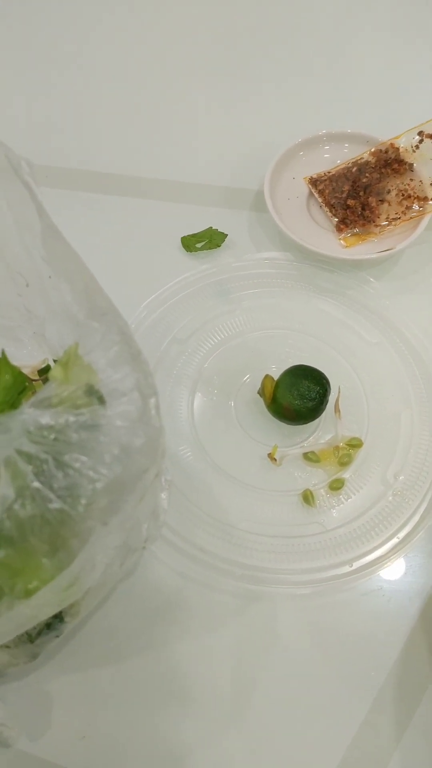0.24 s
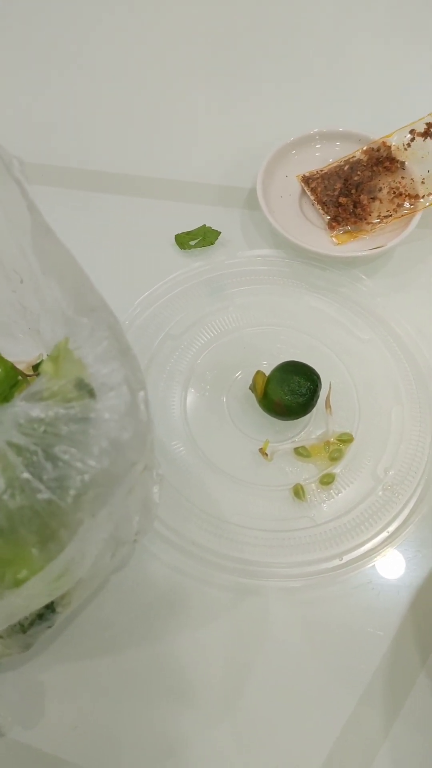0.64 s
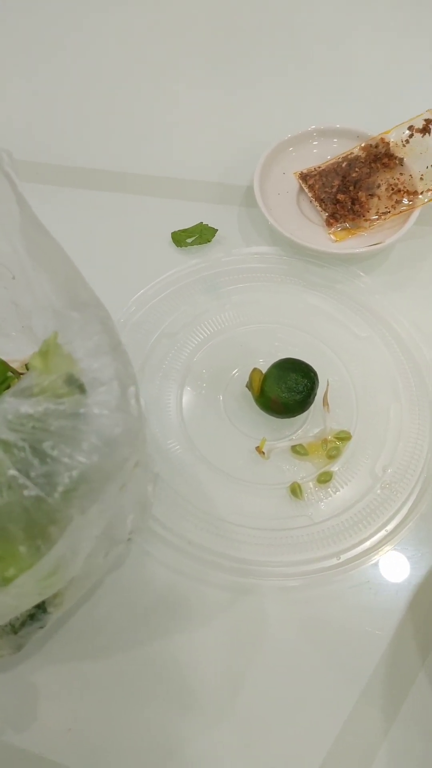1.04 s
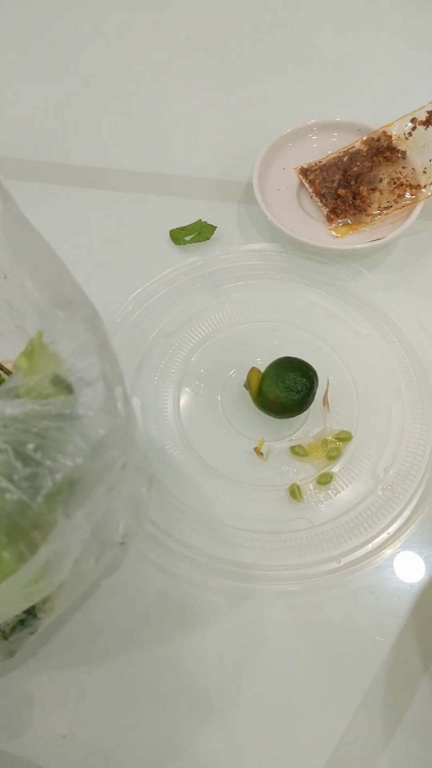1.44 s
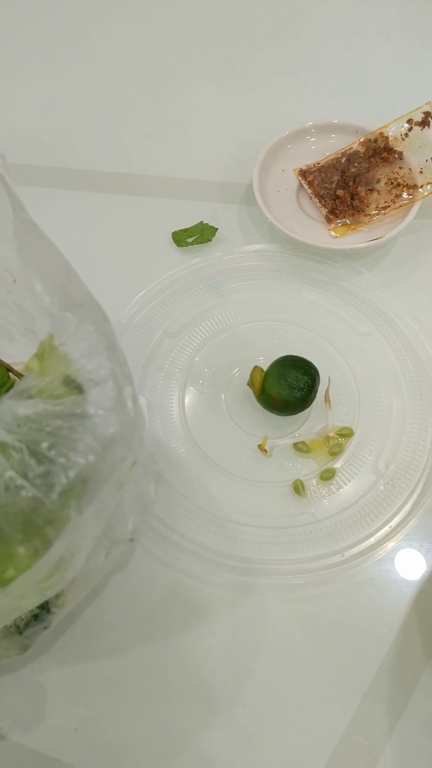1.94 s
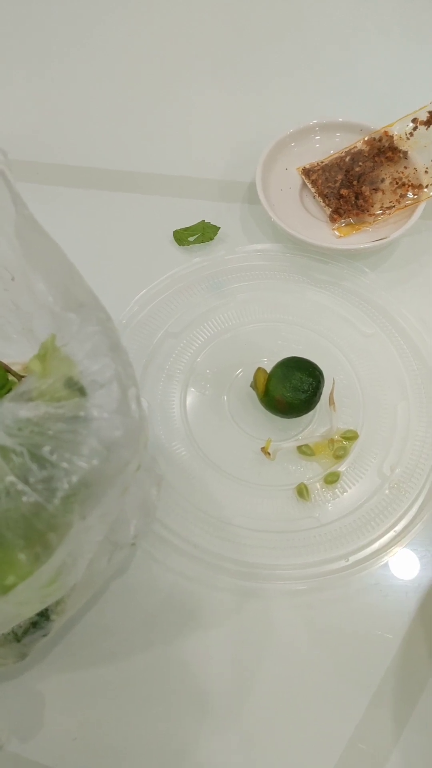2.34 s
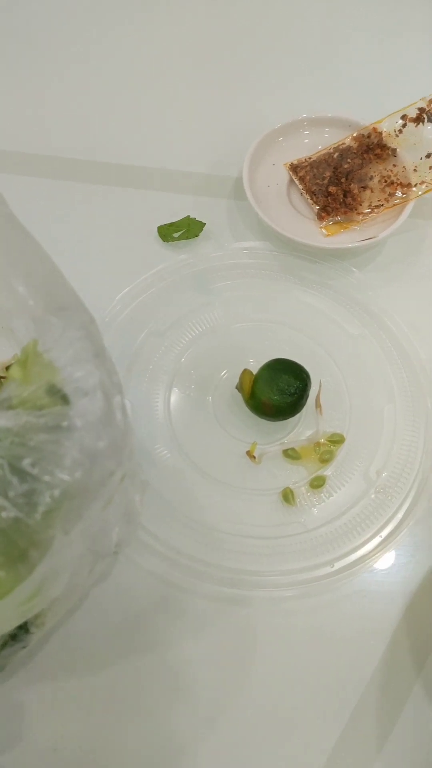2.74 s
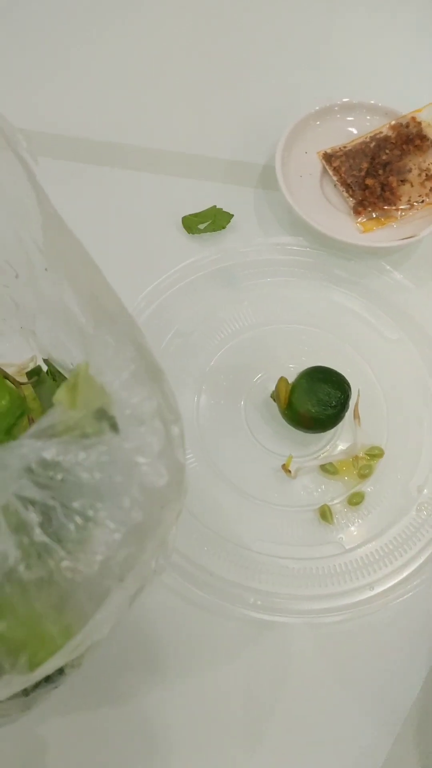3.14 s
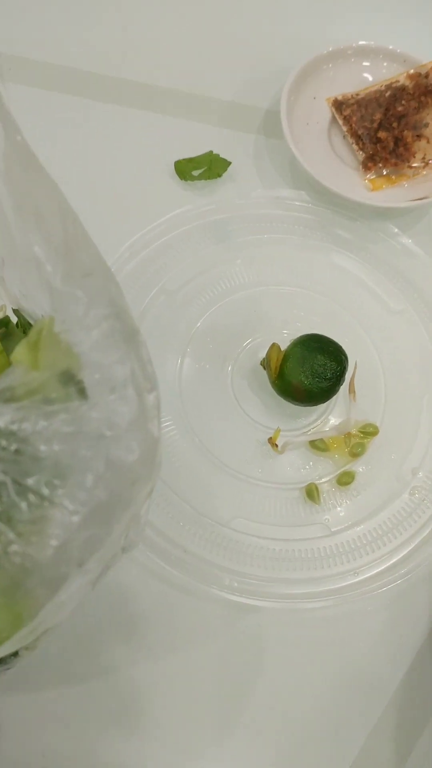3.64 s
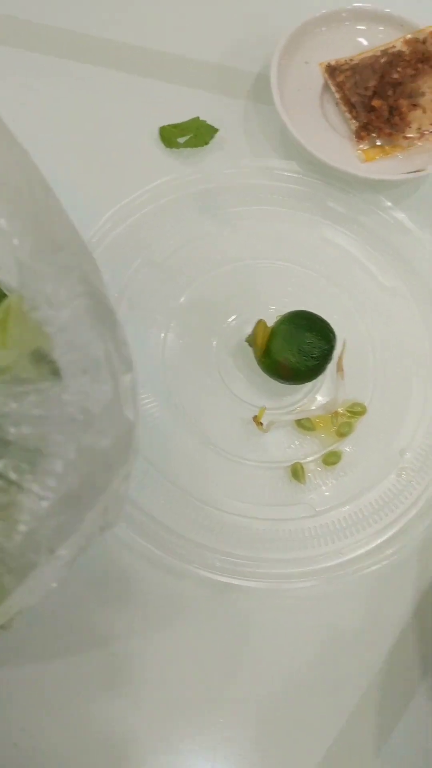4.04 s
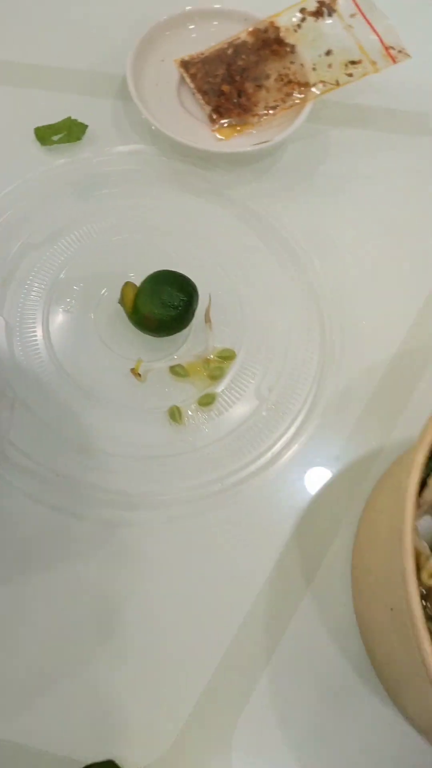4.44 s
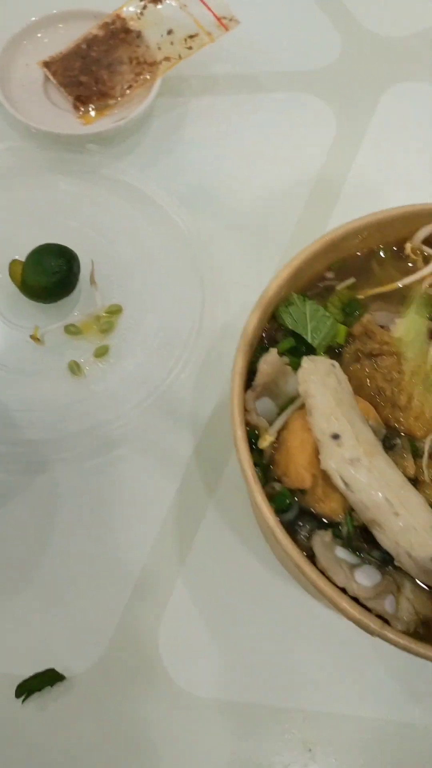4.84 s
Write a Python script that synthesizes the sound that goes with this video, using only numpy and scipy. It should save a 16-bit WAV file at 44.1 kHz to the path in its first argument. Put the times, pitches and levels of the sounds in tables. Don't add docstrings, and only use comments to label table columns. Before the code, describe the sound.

Thin plastic food containers click and tap in uneven bursts on a table, over a steady low fan hum in an echoing room.

```python
import sys
import numpy as np
from scipy import signal
from scipy.fft import rfft, irfft
from scipy.io import wavfile

SR = 44100
rng = np.random.default_rng(int(sys.argv[2]) if len(sys.argv) > 2 else 0)


def rack_gain(trim_db):
    fader = np.asarray(trim_db, float)
    return 10 ** (fader / 20)


def wav_record(signal):
    frames = np.transpose(np.atleast_2d(signal))
    bounded = np.clip(frames, -1, 1)
    quanta = np.round(bounded * 32767).astype(np.int16)
    wavfile.write(sys.argv[1], SR, quanta)


N = 223840

# start in seconds, peak in dB, body mode in Hz, crack relative to it in dB.
LID_TAPS = [(0.3207, -19.5, 1180, -32), (1.433, -46.5, 1740, 2), (2.1902, -21.5, 895, -14),
            (2.2035, -21.5, 960, -65), (2.3751, -19, 1190, -32), (2.5836, -37, 770, -50),
            (3.617, -45.5, 970, -30), (3.8493, -32, 1297, -43), (4.378, -19.5, 605, -23),
            (4.5194, -19, 1023, -28), (4.7587, -34, 1180, -13)]
# start in seconds, peak in dB, body mode in Hz, crack relative to it in dB.
TUB_TAPS = [(0.3186, -28.5, 1070, -13), (1.4961, -43, 950, -9), (2.1865, -23, 1325, -23),
            (2.1933, -32.5, 437, -14), (2.196, -27, 950, -25), (2.2002, -25, 785, -52),
            (2.372, -36.5, 1570, 0), (3.0844, -49, 1300, -2), (3.0887, -44.5, 960, -3),
            (3.705, -32, 503, -35), (3.7149, -29, 727, -39), (4.3161, -29, 850, -9),
            (4.3442, -42.5, 2540, -17), (4.8807, -40.5, 1020, -3), (4.885, -39, 860, -9)]
# start in seconds, peak in dB, body mode in Hz, relative crack in dB.
LATCH_SNAPS = [
    (.229, -56, 1910, -20),
    (0.321, -25.5, 2423, -12),
    (.7538, -38.5, 2210, -20),
    (3.8486, -29.5, 3000, -25),
    (4.378, -33.5, 1900, -37),
    (4.897, -50, 2420, -25),
]
# start in seconds, peak in dB, body mode in Hz.
HELD_TAPS = [
    (0.7283, -21.5, 1160),
    (0.755, -39, 1110),
    (.88, -45, 980),
    (2.326, -36, 905),
    (3.711, -33.5, 1180),
    (3.7253, -29, 1200),
    (3.8514, -31.5, 432),
    (4.304, -38, 1190),
    (4.5215, -26, 780),
    (4.5481, -39, 1040),
]
# start in seconds, peak in dB.
NAIL_CLICKS = [
    (.279, -59),
    (0.7475, -51),
    (0.9337, -51.5),
    (2.433, -59),
    (4.2053, -49.5),
    (5.04, -46.5),
]
# multiple of the body mode (ratio), level relative to it in dB.
LID_RIM = [(1.48, -2.5), (2.95, -14.5)]
TUB_RIM = [(2.23, -7)]
LATCH_RIM = [(1.33, -0.5), (1.82, -6)]
HELD_RIM = [(2.53, -20.5)]
NAIL_RIM = [(3.9, -14)]
# start in seconds, peak in dB, hollow in Hz, t60 in seconds.
THUMPS = [(2.191, -25.5, 204.4, 0.11), (2.196, -18.5, 358, 0.024), (2.21, -27, 230, 0.079),
          (2.25, -35, 217.5, 0.19), (2.284, -30, 233, 0.062), (2.325, -32, 248, .033),
          (3.086, -33, 218.6, 0.13), (3.74, -52.5, 88, .3), (3.761, -42, 247.6, 0.3),
          (3.851, -40.5, 204.5, 0.28), (4.316, -42.5, 113, 0.1), (4.377, -35, 289, 0.094),
          (4.4, -49, 403, .2), (4.519, -37.5, 206, 0.15)]
# start in seconds, peak in dB, pitch in Hz.
TICKS = [(.322, -48, 11900), (1.2093, -67, 9050), (1.434, -58, 13000), (1.498, -64, 11000),
         (1.53, -68, 10500), (2.187, -51, 11500), (2.376, -63, 12000), (2.556, -68, 10000),
         (3.265, -47.5, 12400), (3.2663, -53, 15000), (3.2675, -47, 7800), (3.288, -53, 13500),
         (3.3349, -56, 13000), (3.6627, -52, 5530), (3.8492, -51, 12000), (4.13, -61, 11000),
         (4.88, -61, 11100)]
# start in seconds, peak in dB, pitch in Hz.
SLIDES = [
    (1.7715, -59.5, 5400),
    (2.76, -60, 4900),
    (3.272, -68, 13500),
    (3.875, -59, 5760),
    (3.88, -49, 2420),
]
# time at its height in seconds, spread in seconds, level in dB.
BRUSHES = [
    (.23, 0.027, -76),
    (1.15, 0.15, -88),
    (1.47, 0.064, -71),
    (2.92, 0.19, -71),
    (3.65, 0.19, -67),
    (4.14, 0.042, -93),
    (4.45, 0.19, -74.5),
    (4.74, 0.07, -70.5),
]
# start in seconds, level in dB.
SETTLING = [
    (0, -71.5),
    (.36, -69.5),
    (.755, -69),
    (1.56, -75.5),
    (2.2, -67),
    (2.4, -83),
    (3.855, -63),
    (4.35, -65.5),
    (4.95, -73),
]
# frequency in Hz, density in dB per Hz.
RUSTLE_COLOUR = [(1200, -14), (2200, 17), (4500, 8), (6000, 4.5), (7500, -11), (10000, -44)]
# frequency in Hz, density in dB per Hz.
SHEEN_COLOUR = [(6000, -13), (9000, -6), (13000, -13.5), (16000, -16)]
# frequency in Hz, t60 in seconds.
ROOM_T60 = [(200, 0.61), (1000, 0.77), (4000, 0.69), (10000, 1)]
# peak in dB, low edge in Hz, high edge in Hz, t60 in seconds.
EARLIER_KNOCK = (-46.5, 502, 1781, 0.5)
# frequency in Hz, density in dB per Hz.
AIR = [(20, -14.5), (50, -21), (110, -29), (140, -21), (200, -5.5), (300, -9.5), (400, -18.5), (800, -24.5),
       (1250, -24.5), (1700, -33.5), (2300, -48), (4500, -63), (7500, -56.5), (16000, -79)]
# centre in Hz, width in Hz, density in dB per Hz.
DUCT = [(161, 7.7, -17.5), (190.5, 10, -5), (244.6, 18.1, 2), (275.3, 11, -4.5), (341.6, 4.9, -3.5),
        (579, 7.6, -7.5), (1190, 135, -26.5), (2900, 420, -27), (3288, 570, -22.5), (3630, 380, -29),
        (5770, 950, -50.5), (9700, 360, -63)]
# centre in Hz, width in Hz, height over the air noise in dB.
WHINE = [(2930, 30, 4), (3110, 40, 3), (3360, 55, 6.5), (3570, 40, 3)]
# frequency in Hz, left-right likeness (ratio).
LIKENESS = [(60, 0.77), (130, 0.98), (290, 0.91), (640, 0.36), (1410, -0.0), (3100, 0.19), (6820, 0.0),
            (15000, 0)]
# frequency in Hz, left minus right in dB.
LEAN = [(60, 3), (240, -2), (950, -1.5), (3770, 1.5), (15000, -7)]

RING_T60_S, RING_SLOPE = 0.014, 0.35
CRACK_LOW_HZ, CRACK_HIGH_HZ, CRACK_T60_S = 3000, 5920, 0.011
SPLASH_DB, SPLASH_T60_S = -7, 0.031
HELD_CRACK_DB = -41
NAIL_HZ, NAIL_CRACK_DB = 1300, -5
TICK_T60_S, SLIDE_T60_S = 0.008, 0.32
SETTLE_RISE_S, SETTLE_DB_PER_S = 0.005, 36.5
REST_DB = -92
BRUSH_SHEEN_DB, SETTLE_SHEEN_DB, REST_SHEEN_DB = -7.5, -17, 1.5
HANDS_PAN_DB, HANDS_LAG_S = -4.5, 0.00004
PULSE_DB = -21.5
ROOM_DB, MODES_TO_ROOM_DB = -35, -18
FIRST_WALL_S, EARLY_T60_S, EARLY_DB, WALL_CUT_HZ = 0.0097, 0.2, -2.5, 3640
HUM_DB, MOTOR_HZ, MOTOR_DB = -51, 157, -63
BASS_CUT_HZ, TOP_CUT_HZ = 119, 15700


def taps():
    near, far = np.zeros((2, N)), np.zeros(N)
    for s, db, body_hz, crack_db, rim_ratios in contacts():
        rise_cycles = 0.15 - crack_db / 80
        rim = [(body_hz * times, rim_db) for times, rim_db in rim_ratios]

        for hz, level_db in [(body_hz, 0), (body_hz * 0.751, -11), *rim]:
            t60 = RING_T60_S * (hz / 1000) ** -RING_SLOPE
            add(near, s, rack_gain(db + level_db) * ring(hz, t60, rise_cycles, 1.172))
        snap = crack(CRACK_LOW_HZ, CRACK_HIGH_HZ, CRACK_T60_S, 0.51)
        add(near, s, rack_gain(db + crack_db) * snap)
        rim_hz, rim_db = rim[0]
        splash = crack(body_hz * 0.24, rim_hz * 1.34, SPLASH_T60_S, 0.79)
        add(near, s, rack_gain(db + SPLASH_DB + rim_db / 2) * splash)

        add(far, s, rack_gain(db) * knock(body_hz * 0.5, body_hz * 1.265))
        for hz, level_db in rim:
            add(far, s, rack_gain(db + level_db) * knock(hz * 0.52, hz * 1.45))
        add(far, s, rack_gain(db + crack_db - 7) * knock(CRACK_LOW_HZ, CRACK_HIGH_HZ))
    return near, far


def contacts():
    lid = [(*row, LID_RIM) for row in LID_TAPS]
    tub = [(*row, TUB_RIM) for row in TUB_TAPS]
    latch = [(*row, LATCH_RIM) for row in LATCH_SNAPS]
    held = [(*row, HELD_CRACK_DB, HELD_RIM) for row in HELD_TAPS]
    nails = [(*row, NAIL_HZ, NAIL_CRACK_DB, NAIL_RIM) for row in NAIL_CLICKS]
    return lid + tub + latch + held + nails


def ring(hz, t60, rise_cycles, bend):
    t = np.arange(round(t60 * SR)) / SR
    decay = rack_gain(-60 * (t / t60) ** bend)
    build = 1 - np.exp(-(t * hz / rise_cycles) ** 2)
    return np.sin(2 * np.pi * hz * t) * decay * build


def crack(low_hz, high_hz, t60, alike):
    t = np.arange(9000) / SR
    shared, left, right = rng.standard_normal((3, len(t)))
    noise = alike * shared + (1 - alike) * np.array([left, right])
    spit = band(noise * rack_gain(-60 * t / t60), low_hz, high_hz, order=3)
    return spit / np.abs(spit).max()


def knock(low_hz, high_hz):
    impulse = 1.0 * (np.arange(600) == 0)
    pulse = band(impulse, low_hz, high_hz, order=2)
    return pulse / np.abs(pulse).max()


def thumps():
    out = np.zeros(N)
    for s, db, hz, t60 in THUMPS:
        add(out, s, rack_gain(db) * ring(hz, t60, 0.63, 0.94))
    return out


def ticks():
    out = np.zeros((2, N))
    for rows, t60 in [(TICKS, TICK_T60_S), (SLIDES, SLIDE_T60_S)]:
        for s, db, hz in rows:
            add(out, s, rack_gain(db) * crack(hz * 0.7, hz * 1.21, t60, 0.39))
    return out


def rustle():
    t = np.arange(N) / SR
    brushing = sum(rack_gain(db) * np.exp(-0.5 * ((t - s) / spread) ** 2) for s, spread, db in BRUSHES)
    settling = 0
    for s, db in SETTLING:
        age = np.maximum(t - s, 0)
        settling = settling + rack_gain(db - SETTLE_DB_PER_S * age) * (1 - np.exp(-age / SETTLE_RISE_S))

    unevenness_db = 1.2 * drift(150) + 1.7 * drift(6.6)
    grains = rng.standard_normal((2, N)) * rack_gain(unevenness_db)
    dull = coloured(grains, rack_gain(at_hz(RUSTLE_COLOUR, bins(N))))
    sheen = coloured(grains, rack_gain(at_hz(SHEEN_COLOUR, bins(N))))
    body = brushing + settling + rack_gain(REST_DB)
    shine = rack_gain(BRUSH_SHEEN_DB) * brushing + rack_gain(SETTLE_SHEEN_DB) * settling + rack_gain(REST_DB + REST_SHEEN_DB)
    return rack_gain(1.0) * (body * dull + rack_gain(-6.5) * shine * sheen)


def room(x):
    t = np.arange(SR) / SR
    white, echo = rng.standard_normal((2, SR)), 0
    after = np.maximum(t - FIRST_WALL_S, 0)
    early = rack_gain(EARLY_DB - 60 * after / EARLY_T60_S)
    for low_hz in 88 * 2.0 ** np.arange(8):
        late = rack_gain(-60 * after / at_hz(ROOM_T60, low_hz * np.sqrt(2)))
        echo = echo + band(white, low_hz, 2 * low_hz, order=2) * (late + early)
    echo = echo * (1 - np.exp(-after / 0.0041))
    soft_goods = signal.butter(2, WALL_CUT_HZ, fs=SR, output="sos")
    echo = signal.sosfilt(soft_goods, echo)
    return signal.fftconvolve(echo, x[None], axes=1)[:, :N]


def fan():
    hz = bins(N)
    power = rack_gain(at_hz(AIR, hz)) ** 2
    power = power + resonances(DUCT, hz)
    power = power * (1 + resonances(WHINE, hz))

    alike = np.clip(at_hz(LIKENESS, hz), 0, 1)
    lean = rack_gain(at_hz(LEAN, hz) / 2)
    mid, side = rfft(rng.standard_normal((2, N)))
    mid = np.sqrt(1 + alike) * mid
    side = np.sqrt(1 - alike) * side
    ports = np.array([(mid + side) * lean, (mid - side) / lean])
    hum = irfft(np.sqrt(power) * ports, N)

    turning = 2 * np.pi * np.cumsum(MOTOR_HZ + 0.83 * drift(4.3)) / SR
    motor = rack_gain(MOTOR_DB + 1.3 * drift(4.65)) * np.sqrt(2) * np.sin(turning)
    return rack_gain(HUM_DB + 0.3 * drift(3.7)) * rms_one(hum) + motor


def resonances(rows, hz):
    total = 0
    for centre_hz, width_hz, db in rows:
        detune = (hz - centre_hz) / (width_hz / 2)
        total = total + rack_gain(db) ** 2 / (1 + detune ** 2) ** 2
    return total


def band(x, low_hz, high_hz, order):
    edges = [low_hz, min(high_hz, 0.45 * SR)]
    return signal.sosfilt(signal.butter(order, edges, "band", fs=SR, output="sos"), x)


def at_hz(points, hz):
    points_hz, values = np.transpose(points)
    return np.interp(np.log(hz), np.log(points_hz), values)


def rms_one(x):
    return x / np.sqrt(np.mean(x ** 2))


def bins(size):
    return np.maximum(np.arange(size // 2 + 1) * SR / size, 1)


def drift(rate_hz):
    knots = rng.standard_normal(N // 100)
    return rms_one(np.interp(np.arange(N) * rate_hz / SR, np.arange(len(knots)), knots))


def coloured(white, gain):
    return rms_one(irfft(rfft(white) * gain, N))


def add(out, s, sound):
    at = round(s * SR)
    out[..., at:at + sound.shape[-1]] += sound[..., :N - at]


def scene():
    near, far = taps()
    others = thumps() + ticks()
    sent = far + rack_gain(MODES_TO_ROOM_DB) * near[1] + rack_gain(-4) * others[1]
    hands = near + rack_gain(PULSE_DB) * far + others
    hands[0] = np.interp(np.arange(N) - HANDS_LAG_S * SR, np.arange(N), hands[0])
    pan = rack_gain(np.array([[0.5], [-0.5]]) * HANDS_PAN_DB)
    out = hands * pan + rack_gain(ROOM_DB) * room(sent)
    db, low_hz, high_hz, t60 = EARLIER_KNOCK
    add(out, 0, rack_gain(db) * crack(low_hz, high_hz, t60, 0.13))
    return out + rustle() + fan()


def band_limit(x):
    return signal.sosfilt(signal.butter(12, 16470, fs=SR, output="sos"), x)


def record(dry):
    bass_cut = signal.butter(2, BASS_CUT_HZ, "high", fs=SR, output="sos")
    top_cut = signal.cheby2(10, 40, TOP_CUT_HZ + 500, fs=SR, output="sos")
    heard = signal.sosfilt(top_cut, signal.sosfilt(bass_cut, dry))
    return band_limit(heard)


dry = scene()
out = record(dry)
wav_record(out)
```